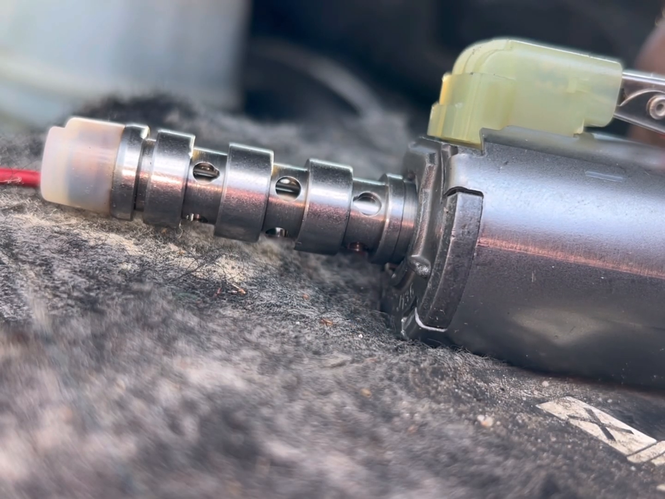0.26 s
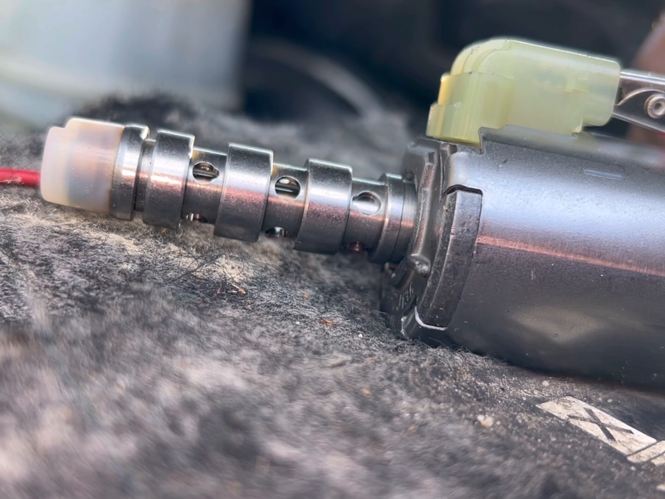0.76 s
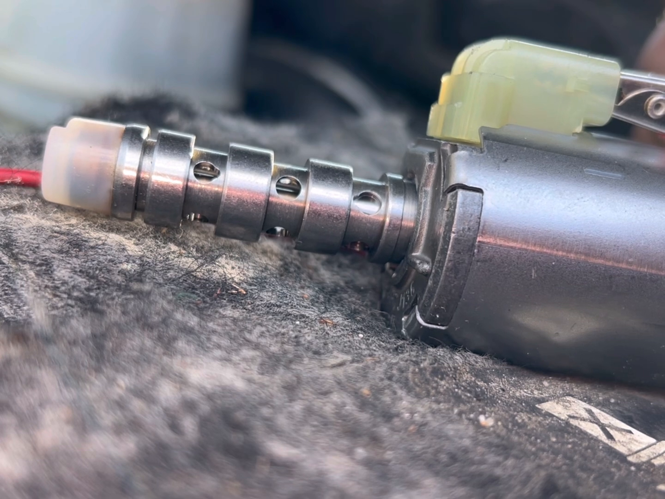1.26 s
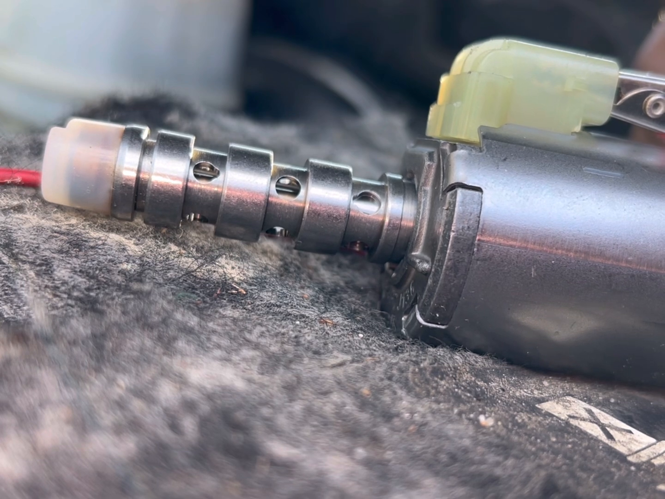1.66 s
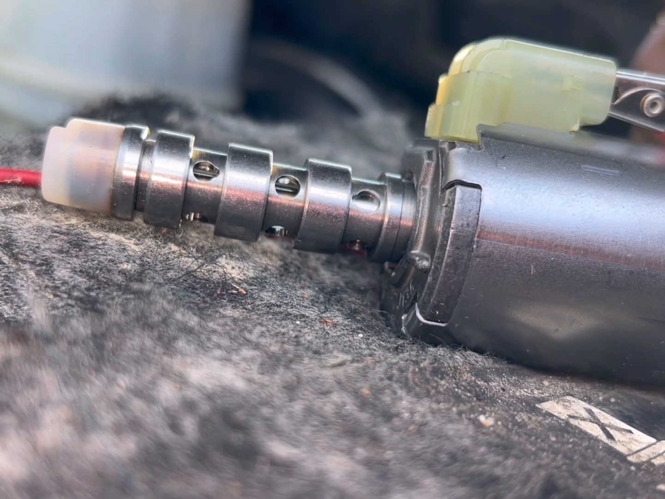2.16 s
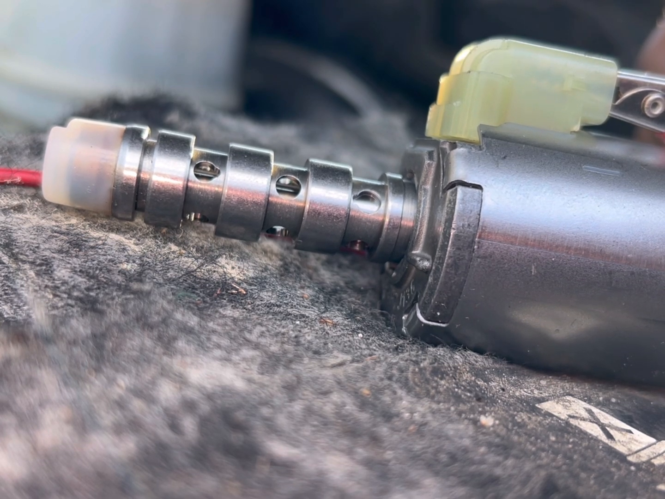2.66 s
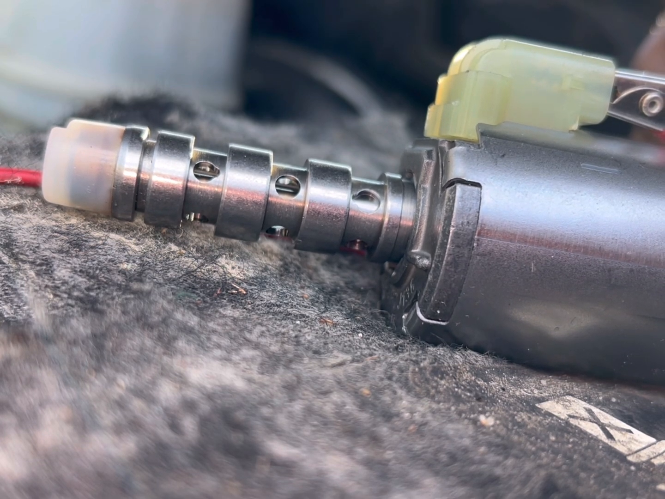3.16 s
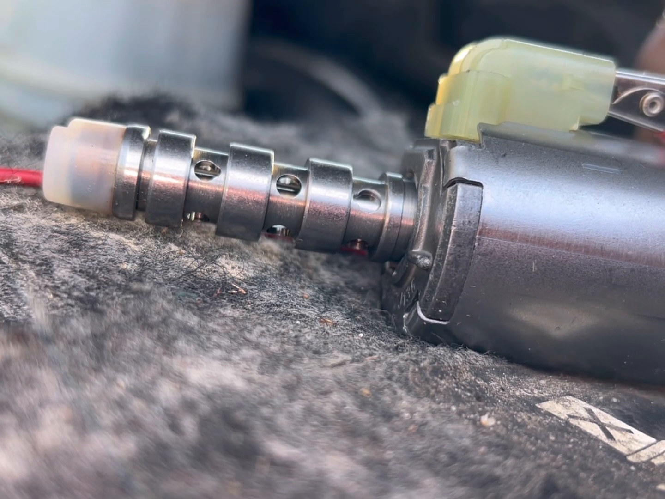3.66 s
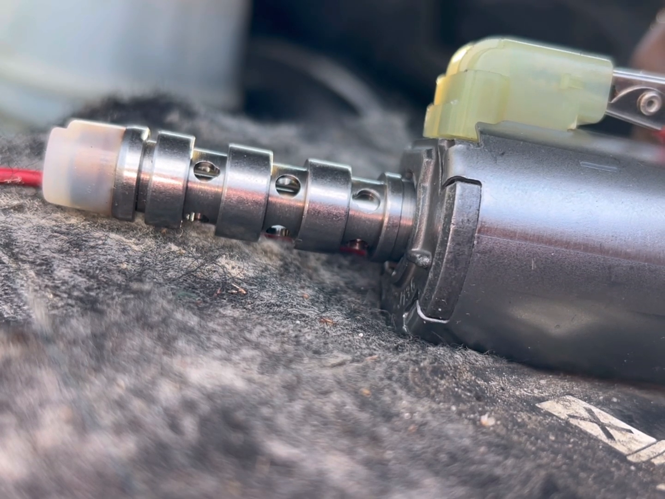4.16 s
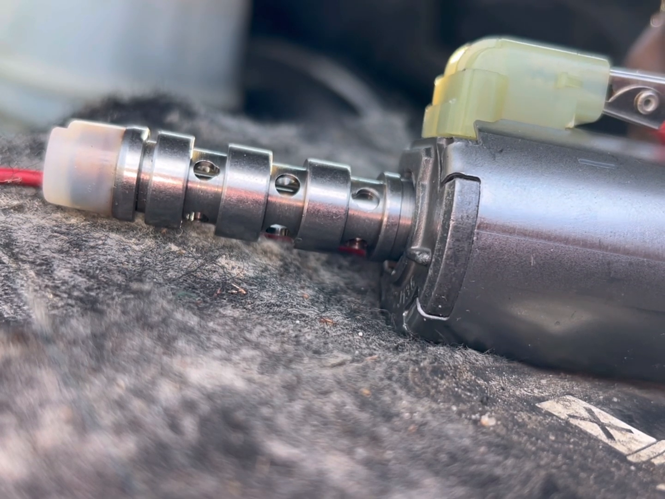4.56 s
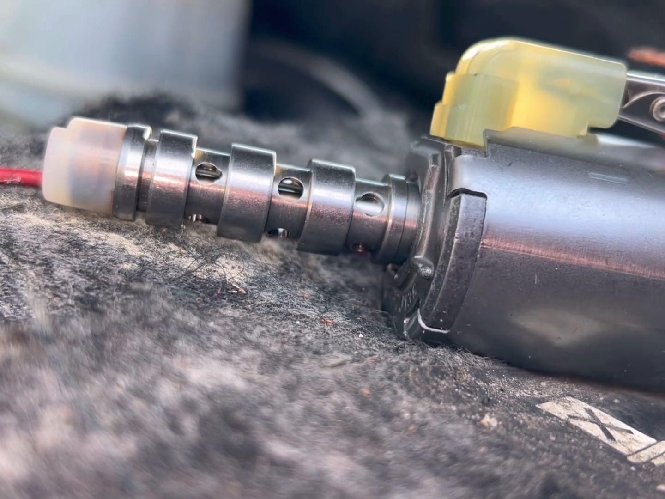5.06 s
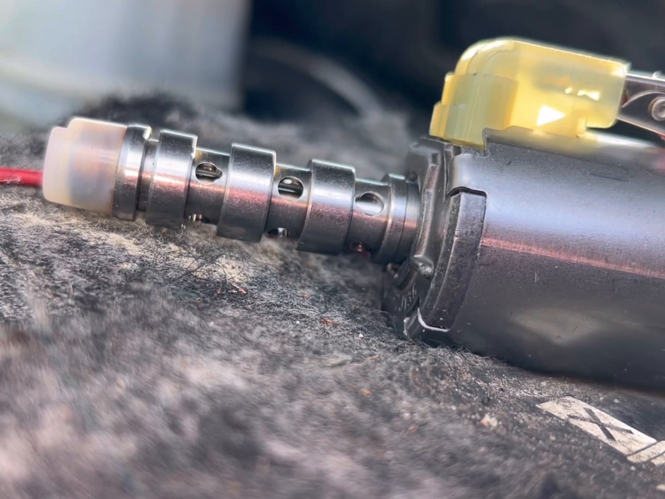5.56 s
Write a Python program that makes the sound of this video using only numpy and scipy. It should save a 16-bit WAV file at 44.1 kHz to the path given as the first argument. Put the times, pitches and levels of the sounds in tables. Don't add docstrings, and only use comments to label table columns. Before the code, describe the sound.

A close, dry stereo capture by phone microphones beside a small metal valve on a cloth-covered bench. Deep, uneven machinery rumble with a low hum and faint high air hiss runs throughout, strongest at the very start, where cloth rustles briefly. Tiny wire scratches come near 0.3 and 0.75 s. At 0.9 s the plunger snaps in with a bright dry tick; at 1.15 s it is thrown back with a harder clack, heavy low jolt, metallic ring and small landing. Similar pairs follow at 2.1 and 2.5 s, then 3.1 and 3.55 s, with short friction squeals before releases and quick rebounds after. A release at 4.5 s barely jolts; a scraping snap at 4.7 s and ringing clack at 4.83 s follow quickly. Crisp wire scratches crackle around 4.95-5.07 s, a low cloth drag comes at 5.2 s, and light rubbing and faint distant squeaks lead to the end near 6 s.

```python
import sys
import numpy as np
from scipy import signal
from scipy.fft import rfft, irfft, next_fast_len
from scipy.io import wavfile
from scipy.ndimage import uniform_filter1d

SR = 44100
rng = np.random.default_rng(int(sys.argv[2]) if len(sys.argv) > 2 else 0)


def to_wav(s):
    ch = np.atleast_2d(s).T
    pcm = np.round(np.clip(ch, -1, 1) * 32767)
    wavfile.write(sys.argv[1], SR, pcm.astype(np.int16))


def field_ratio(decibels):
    return 10 ** (np.asarray(decibels, dtype=float) / 20)


N = 257103
T = np.arange(N) / SR
SIZE = next_fast_len(N + SR // 4)
HZ = np.fft.rfftfreq(SIZE, 1 / SR) + .1


def shape(x, response):
    return irfft(rfft(x, SIZE) * response, SIZE)[..., :N]


def on_log(table):
    hz, value = np.transpose(table)
    return np.interp(np.log(HZ), np.log(hz), value)


def coloured(table, db):
    colour = field_ratio(on_log(table))
    return field_ratio(db) * colour / np.sqrt(np.mean(colour ** 2))


def resonances(modes):
    total = 0
    for k, (f, width, db) in enumerate(modes):
        damping = 1j * HZ * width
        total = total + (-1) ** k * field_ratio(db) * damping / (f * f - HZ ** 2 + damping)
    return total


def ms_from(s):
    return (T - s) * 1000


def burst(s, rise_ms, fall_ms):
    ms = ms_from(s)
    return np.exp(np.where(ms < 0, ms / rise_ms, -ms / fall_ms))


def hump(s, length_ms, power=2):
    return np.exp(-(ms_from(s) / length_ms) ** power)


def walk(rate):
    k = int(SR / rate)
    held = np.repeat(rng.standard_normal(N // k + 1), k)
    return uniform_filter1d(uniform_filter1d(held, k), k)[:N]


def blow(s):
    n = (T - s) * SR
    return np.sinc(n) * np.exp(-(n / 8) ** 2)


def rings(modes, s, db):
    t = np.clip(T - s, 0, None)
    tones = 0
    for f, mode_db, t60 in modes:
        level = field_ratio(mode_db + 1.5 * rng.standard_normal() + 4 * walk(60))
        decay = np.exp(-np.log(1000) * t / t60)
        tones = tones + level * decay * np.sin(2 * np.pi * f * t + .6 * walk(90))
    return field_ratio(db) * tones * (1 - np.exp(-t / .008))


# (frequency [Hz], level [dB per Hz])
AIR_MID = [(15, -41), (25, -17), (49, 1), (86, -1.5), (133, -7), (185, -17), (308, -26), (515, -26),
           (696, -33.5), (965, -35), (2130, -48), (2620, -59), (2950, -55), (6500, -72), (8450, -99.5),
           (14300, -120)]
AIR_SIDE = [(15, -51.5), (25, -19.5), (63, -5), (161, -7), (288, -16.5), (347, -11.5), (649, -12),
            (839, -21), (1400, -20.5), (1940, -35.5), (2680, -38), (3550, -45), (6500, -54), (8450, -80),
            (14300, -120)]
# (time [s], load [dB])
MACHINE_LOAD = [(0, 14), (.3, 5.5), (1.1, 8), (1.4, 7), (1.75, 8.5), (1.92, 6), (2.12, -9), (2.5, 1.8),
                (3.0, 3.5), (3.35, -7.5), (3.95, 1.04), (4.5, -4), (4.87, 2.5), (5.3, -.7), (5.83, -0.5)]
LOAD_SHARES = (0.97, 0.14, 0.021)


def rumble(noises):
    load_db = np.interp(T, *np.transpose(MACHINE_LOAD))
    below_220 = 1 / (1 + (HZ / 220) ** 4)
    below_1700 = 1 / (1 + (HZ / 1700) ** 4)
    bands = [below_220 / (1 + (57.1 / HZ) ** 6), below_1700 - below_220, 1 - below_1700]
    flicker_db = [2.3, 1.5, 1.5]
    pair = np.zeros((2, N))
    for i, (table, db, follow) in enumerate(((AIR_MID, -46.5, 1.0), (AIR_SIDE, -61, .7))):
        for band, share, flicker in zip(bands, LOAD_SHARES, flicker_db):
            swell = field_ratio(follow * share * load_db + flicker * walk(12.0))
            pair[i] += swell * shape(noises[i], coloured(table, db) * band)
    return pair


# (frequency [Hz], level [dB per Hz])
LEAK_MID = [(3820, -49.5), (6500, -13.5), (7820, -8.5), (8620, -8), (9120, -7), (9690, -19), (10300, -9),
            (10750, 8), (11200, -13.5), (12600, -7.5), (14500, -15.5), (15200, -22), (16000, -45.5)]
LEAK_SIDE = [(3820, -54.5), (6500, -26), (7390, -30.5), (8530, -19), (9400, -8.5), (10400, 2), (10900, -2),
             (12000, -29.5), (12200, -44.5), (13300, -42.5), (13700, -26.5), (15100, -24), (16000, -24.5)]


def hiss(noises):
    waver = field_ratio(1.5 * np.sin(9 * T + 2 * np.sin(2.3 * T)))
    mid = waver * shape(noises[0], coloured(LEAK_MID, -78.5))
    side = waver * shape(noises[1], coloured(LEAK_SIDE, -71))
    return np.array([duck() * mid, side])


def duck():
    moments = [*PULL_TIMES, *DROP_TIMES, *(s for s, _ in KNOCKS)]
    return field_ratio(sum(-18 * hump(s + .015, 40, 4) for s in moments))


# (frequency [Hz], width [Hz], level [dB])
MACHINE_TONES = [(159.74, 9.9, -61), (500, 2.1, -73.5), (906, 140, -75.5)]


def machine():
    out = np.zeros(N)
    for f, width, db in MACHINE_TONES:
        gain = field_ratio(db) * np.sqrt(SR / (np.pi * width))
        out += shape(rng.standard_normal(N), gain * resonances([(f, width, 0)]) ** 2)
    return out


# (time [s], level [dB], length [ms], centre [Hz])
CLOTH_MOVES = [
    (0.0, -47, 10, 1540),
    (2.339, -72.5, 50, 3000),
    (2.68, -66, 106, 2310),
    (2.801, -61.5, 170, 353.7),
    (4.751, -71, 300, 2500),
    (5.198, -44.5, 99, 440),
    (5.4, -73.5, 450, 2500),
    (5.63, -59, 72, 1780),
    (5.77, -59.5, 76, 2140),
]


def rustle():
    grains = rng.standard_normal(N) * field_ratio(1.5 * walk(250) + 1.5 * walk(20))
    out = np.zeros(N)
    for s, db, ms, f in CLOTH_MOVES:
        out += shape(field_ratio(db) * hump(s, ms) * grains, resonances([(f, 1.444 * f, 0)]) ** 2)
    return out


# (time [s], level [dB], length [ms])
WIRE_SCRATCHES = [(.005, -52.5, 3), (0.297, -66.5, 8.9), (0.754, -69, 6.4), (4.060, -81, 4),
                  (4.946, -35.5, 1.3), (4.95, -45, 2.1), (4.986, -47, 3.6), (4.989, -64, 1.5),
                  (4.997, -44.5, 2.2), (5.003, -47, 1.63), (5.0743, -40, 1.8)]


def wire():
    scratch = sum(field_ratio(db) * burst(s, 0.25 * ms, 0.25 * ms) for s, db, ms in WIRE_SCRATCHES)
    thin = resonances([(2500, 3000, -7), (7030, 2600, 4.5), (11700, 10300, 4)])
    return shape(scratch * rng.standard_normal(N), thin)


# (time [s], frequency [Hz], length [ms], level [dB])
FAR_SQUEAKS = [
    (.30, 2600, 12, -79),
    (2.63, 3000, 10, -77),
    (4.985, 2620, 12, -71),
    (4.985, 4000, 10, -77),
    (5.28, 2600, 10, -78),
    (5.59, 2700, 9, -73),
]


def squeaks():
    out = np.zeros(N)
    for s, f, ms, db in FAR_SQUEAKS:
        out += field_ratio(db) * hump(s, ms) * np.sin(2 * np.pi * f * T + 0.83 * walk(300))
    return out


def workshop():
    noises = rng.standard_normal((2, N))
    mid, side = rumble(noises) + hiss(noises)
    return mid + machine() + squeaks() + rustle() + slide() + side * np.array([[1], [-1]])


def plunger(times, events, body, loose, modes, second_ms, gain_db, tail_ms, buzz_ms, touch_db, loose_db):
    force, buzz, ring = np.zeros(N), np.zeros(N), np.zeros(N)
    grit = rng.standard_normal(N) * field_ratio(3.9 * walk(1500))
    for s, (db, scrape_db, rattle_db, ring_db) in zip(times, events):
        second_db, buzz_db = touch_db + .6 * rattle_db, loose_db + rattle_db
        ms = ms_from(s)
        strike = field_ratio(13) * blow(s) + field_ratio(-8) * grit * burst(s, .15, .3)
        touch = field_ratio(second_db) * burst(s + second_ms / 1000, .2, .6)
        scrape = field_ratio(scrape_db) * burst(s, 1.7, .3)
        rattle = (ms > 0) * field_ratio(rattle_db) * hump(s, tail_ms, 4)
        force += field_ratio(db + gain_db) * (strike + grit * (touch + scrape + rattle))
        creep = (ms < 0) * (ms > -13) * field_ratio(scrape_db - 8) * burst(s, 6, 1)
        buzz += field_ratio(db) * (creep + (ms > 0) * field_ratio(buzz_db) * burst(s, 1, buzz_ms))
        ring += rings(modes, s, db + ring_db)
    steep = sum(resonances([(f, width, db / 2)]) ** 2 for f, width, db in loose)
    notch = 1 - resonances([(10700, 3000, 0)])
    return shape(force, resonances(body)) + shape(buzz * grit, steep * notch) + ring


PULL_TIMES = (.8908, 2.1109, 3.1291, 4.6845)
# (peak [dB], scrape before [dB], rattle [dB], ring [dB])
PULL_STRIKES = [
    (-11, -43.5, -20.5, -41.5),
    (-10.5, -23, -22, -42),
    (-11, -28, -30, -46),
    (-11, -9.5, -21.5, -41.5),
]
# (frequency [Hz], width [Hz], level [dB])
PULL_RESONANCES = [(1700, 500, -28), (3000, 1200, -23), (5600, 900, -21), (7500, 450, -2), (9500, 800, 1),
                   (12300, 1200, -13), (14700, 800, 1), (16300, 900, -4)]
# (frequency [Hz], width [Hz], level [dB])
PULL_LOOSE = [(2500, 3400, -4.5), (5200, 2500, -4), (8000, 1200, 4.5), (12200, 400, -13.5),
              (14600, 800, -17)]
# (frequency [Hz], level [dB], t60 [s])
PULL_RINGS = [(1701, -10, .42), (4452, -7.5, .42), (5071, -4, .22), (5346, -8, .17), (6153, -5, .24),
              (6751, -5, .12), (7537, -8, .2)]


def pulls():
    return plunger(PULL_TIMES, PULL_STRIKES, PULL_RESONANCES, PULL_LOOSE, PULL_RINGS, second_ms=4.0,
                   gain_db=13, tail_ms=6.0, buzz_ms=45, touch_db=1.5, loose_db=-17)


# (swing [dB], sharp edge [dB], bench rumble [dB])
RELEASE_JERKS = [
    (-3.5, -12.5, -28),
    (-9.5, -9, -37),
    (-14, -9.5, -41.5),
    (-30, -24, -67.5),
    (-17.5, -14.5, -55),
]
# (swing [dB], sharp edge [dB], bench rumble [dB])
PULL_TWITCH = (-51.5, -35, -66)


def jerks():
    return zip(DROP_TIMES + PULL_TIMES, RELEASE_JERKS + [PULL_TWITCH] * len(PULL_TIMES))


def recoil():
    out = np.zeros(N)
    for s, (swing_db, edge_db, bench_db) in jerks():
        ms = ms_from(s)
        build = np.clip(1 + ms / 7, 0, 1) ** 1.8
        swing = np.where(ms < 0, build, np.cos(2 * np.pi * ms / 15.0) * hump(s, 6.3))
        late = np.clip(ms - 60, 0, None) / 80
        bench = late * np.exp(1 - late ** 2) * np.sin(2 * np.pi * 43.0 * (T - s) + .8 * walk(25))
        out += field_ratio(swing_db) * swing + field_ratio(edge_db) * burst(s, 0.28, 0.43) + field_ratio(bench_db) * bench
    return out


# (frequency [Hz], width [Hz], level [dB])
CAN_RESONANCES = [(420, 300, 1.5), (892.4, 500, 0.5), (1535, 260, 4.5), (2616, 2700, -6.5),
                  (4320, 2100, -5.5)]


def can():
    noise = rng.standard_normal(N)
    force = np.zeros(N)
    for s, (_, edge_db, _) in jerks():
        clatter = field_ratio(-8) * noise * (T > s - .012) * burst(s, 3.8, 0.95)
        force += field_ratio(edge_db + 7) * (blow(s) + clatter)
    return shape(force, resonances(CAN_RESONANCES))


# (time [s], level [dB])
SETTLINGS = [
    (.905, -31),
    (2.128, -49.5),
    (3.145, -35),
    (4.528, -32),
    (4.707, -33.5),
    (2.5105, -24.5),
    (3.5780, -24.5),
    (4.8590, -25.5),
]
# (time [s], level [dB])
KNOCKS = [
    (2.5225, -13),
    (3.5896, -13),
    (4.8694, -18.5),
]
# (time [s], level [dB])
FINAL_LANDINGS = [
    (1.1783, -21),
    (2.5813, -21.5),
    (3.6330, -22.5),
    (4.9304, -28),
]


def bounces():
    kinds = ((SETTLINGS, 0.86, 1, -41), (KNOCKS, .48, -1, -6), (FINAL_LANDINGS, 0.88, 1, -23.5))
    return [(s, db, ms, way, db + tick_db) for rows, ms, way, tick_db in kinds for s, db in rows]


def bounce_pushes():
    out = np.zeros(N)
    for s, db, contact_ms, direction, _ in bounces():
        hard = direction < 0
        out += field_ratio(db) * (-burst(s, contact_ms, .5 * contact_ms) if hard else hump(s, contact_ms))
    return out


# (frequency [Hz], level [dB], t60 [s])
BOUNCE_RINGS = [(6304, -9, .7), (7569, 0, .5), (9000, -14, .1)]


def bounce_ticks():
    force, ring = np.zeros(N), np.zeros(N)
    noise = rng.standard_normal(N)
    for s, _, _, _, db in bounces():
        grit = field_ratio(-30) * noise * (T > s) * burst(s, 1, 6)
        force += field_ratio(db) * (grit - field_ratio(6) * blow(s + .0004))
        ring += rings(BOUNCE_RINGS, s, db - 44.5)
    dull = resonances([(1900, 4800, 0.00041)]) / (1 + (HZ / 12000) ** 6)
    return shape(force, dull) + ring


# (time [s], level [dB])
SLIDE_SQUEALS = [
    (1.13, -72),
    (2.465, -64.5),
    (3.52, -55),
    (4.482, -63.5),
    (4.67, -60),
    (4.812, -67),
]
# (frequency [Hz], width [Hz], level [dB])
SQUEAL_BANDS = [(1740, 220, 3), (3580, 200, -2.5), (5400, 200, -1), (6600, 200, 0)]


def slide():
    effort = sum(field_ratio(db) * hump(s, 8.2, 4) for s, db in SLIDE_SQUEALS)
    out = np.zeros(N)
    for band in SQUEAL_BANDS:
        friction = rng.standard_normal(N) * field_ratio(12.5 + 5.2 * walk(30))
        out += shape(effort * friction, resonances([band]) ** 2)
    return out


DROP_TIMES = (1.1523, 2.4793, 3.5410, 4.5004, 4.8265)
# (peak [dB], scrape before [dB], rattle [dB], ring [dB])
DROP_STRIKES = [
    (-7.5, -22.5, -18.5, -25),
    (-5.5, -24.5, -26.5, -39.5),
    (-6, -25.5, -20.5, -43.5),
    (-7.5, -16, -21, -34.5),
    (-6, -20.5, -20.5, -31.5),
]
# (frequency [Hz], width [Hz], level [dB])
DROP_RESONANCES = [(2100, 700, -20), (4000, 2000, -20), (6300, 900, -10), (7550, 500, 0), (9200, 1100, -4),
                   (12900, 1200, -4), (14600, 800, -3), (16200, 900, -12)]
# (frequency [Hz], width [Hz], level [dB])
DROP_LOOSE = [(2320, 8800, -7.5), (5300, 3200, -9), (8040, 1100, 4), (9100, 1100, -1), (13000, 1700, -23),
              (14900, 1000, -21)]
# (frequency [Hz], level [dB], t60 [s])
DROP_RINGS = [(1400, -20, .15), (5313, -18, .16), (7569, -9, .3), (7957, -5, .1), (8145, -14, .2),
              (8942, -14, .2), (9345, -14, .1)]


def drops():
    return plunger(DROP_TIMES, DROP_STRIKES, DROP_RESONANCES, DROP_LOOSE, DROP_RINGS, second_ms=-3.4,
                   gain_db=9, tail_ms=8.0, buzz_ms=24, touch_db=-4, loose_db=-11.5)


# (frequency [Hz], left lead [rad])
PORT_LEAD = [(300, 0), (1300, -1.8), (2500, .8), (4500, .5), (7000, .2), (9000, -2.3), (11400, -4.4),
             (13000, -6.6), (16500, -9.8)]
# (frequency [Hz], left over right [dB])
PORT_SHADE = [(300, -2), (700, 2.5), (1300, -2.5), (2400, 3.5), (4400, 4.5), (7000, 1.85)]


def ports():
    lead = np.exp(.5j * on_log(PORT_LEAD)) * field_ratio(on_log(PORT_SHADE) / 2)
    return np.array([lead, 1 / lead])


def network():
    chirp_turns, chirp_rad = 1.2, .8
    phase = 2 * np.pi * chirp_turns * np.log(HZ / 4000) + chirp_rad
    return np.exp(-1j * phase) / (1 + (30 / HZ) ** 4)


def scene():
    valve = shape(wire() + pulls() + can() + bounce_ticks() + drops(), ports())
    thuds = recoil() + bounce_pushes()
    sides = field_ratio(np.array([[-.4], [.4]]))
    return shape(sides * (valve + thuds), network()) + workshop()


def low_pass(x):
    return signal.sosfilt(signal.butter(12, 17040, fs=SR, output="sos"), x)


def record(dry):
    round_peaks = 1.2 * np.tanh(dry / 1.2)
    top_cut = 1 / (1 + (HZ / 16600) ** 60)
    mix = shape(round_peaks, top_cut)
    return low_pass(mix)


dry = scene()
out = record(dry)
to_wav(out)
```